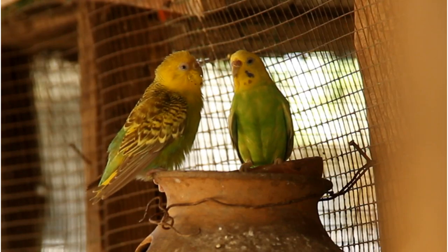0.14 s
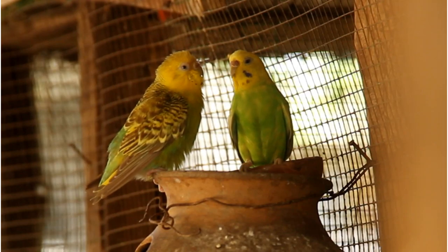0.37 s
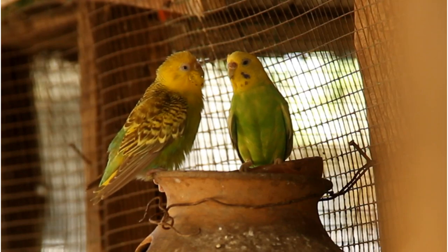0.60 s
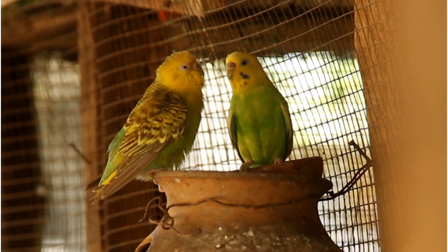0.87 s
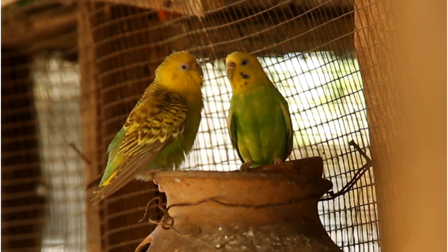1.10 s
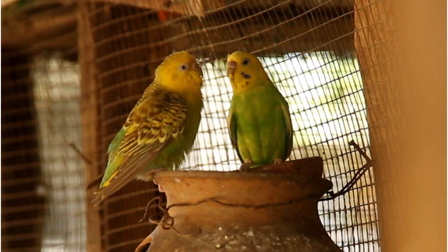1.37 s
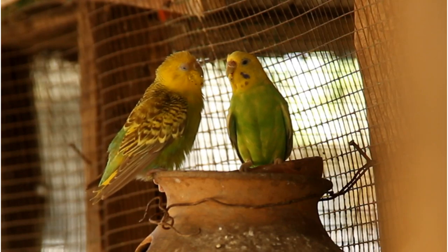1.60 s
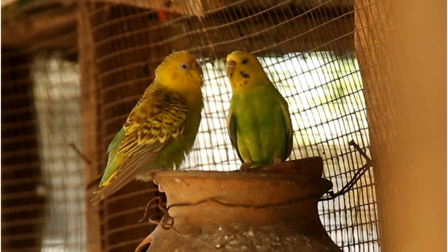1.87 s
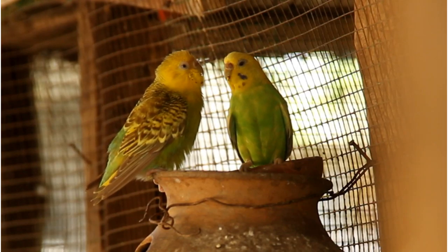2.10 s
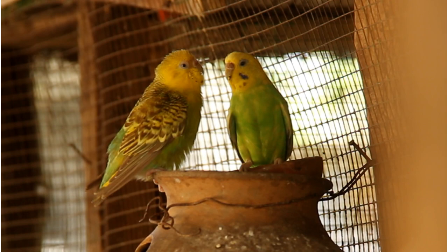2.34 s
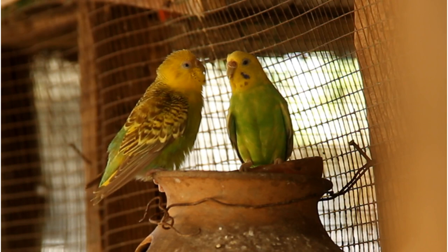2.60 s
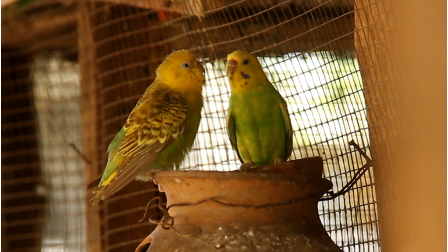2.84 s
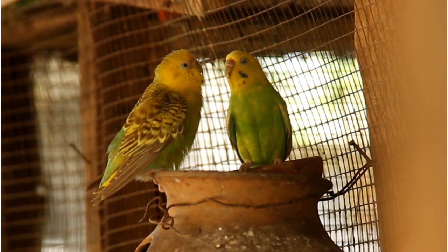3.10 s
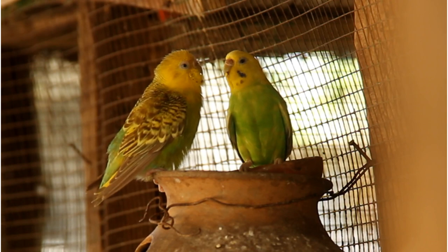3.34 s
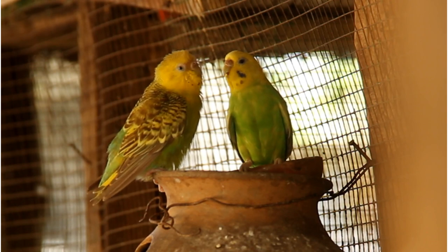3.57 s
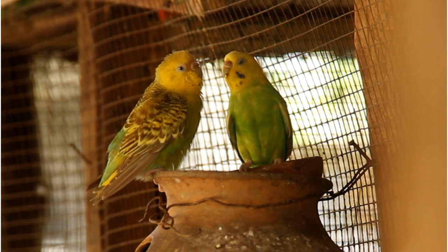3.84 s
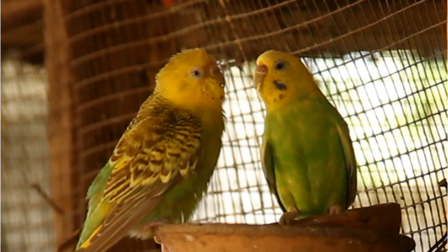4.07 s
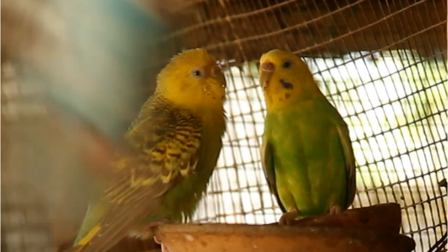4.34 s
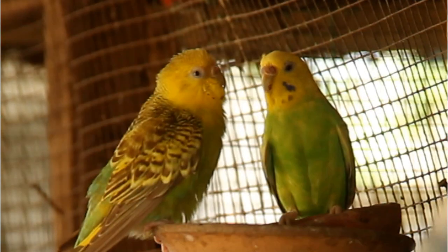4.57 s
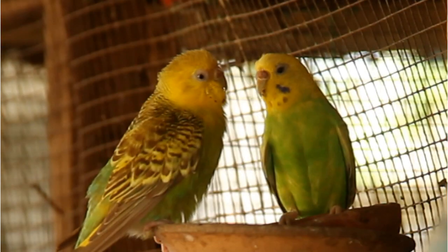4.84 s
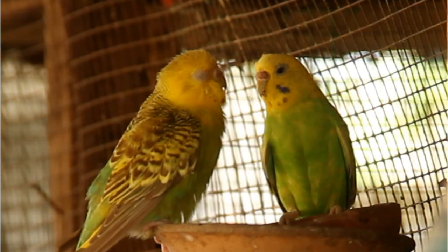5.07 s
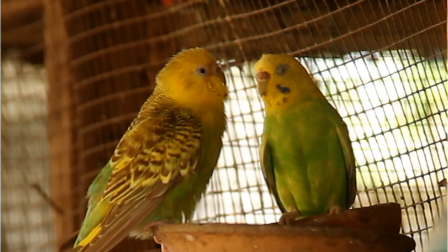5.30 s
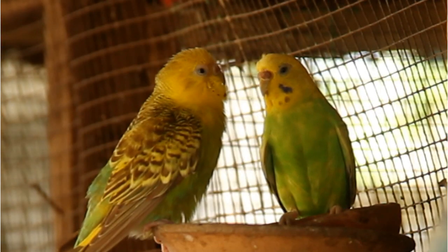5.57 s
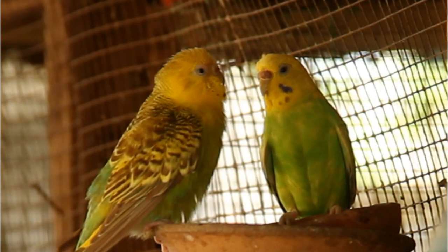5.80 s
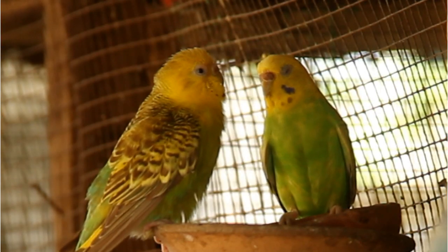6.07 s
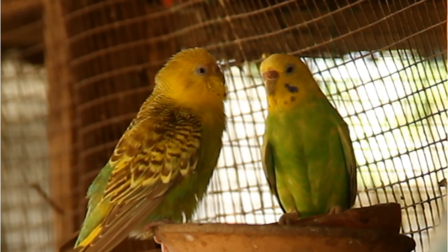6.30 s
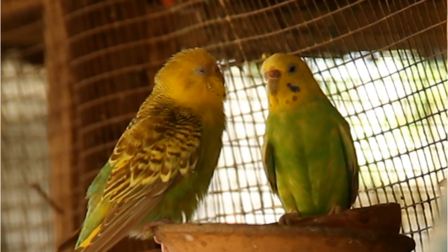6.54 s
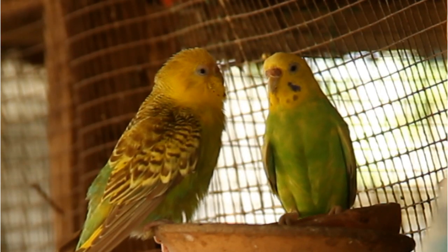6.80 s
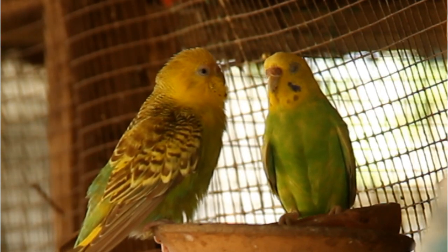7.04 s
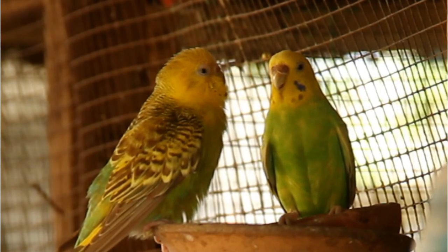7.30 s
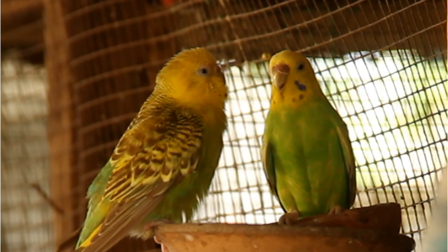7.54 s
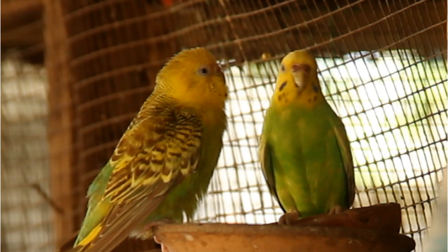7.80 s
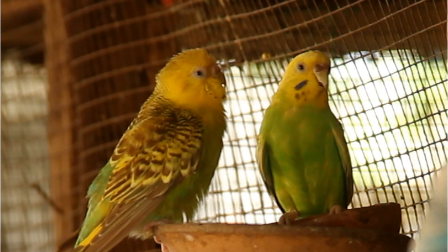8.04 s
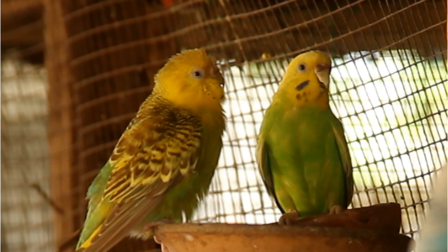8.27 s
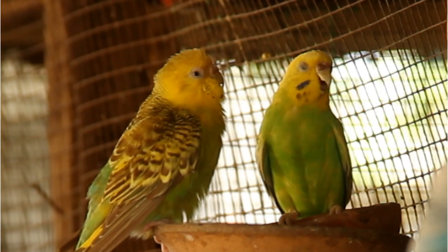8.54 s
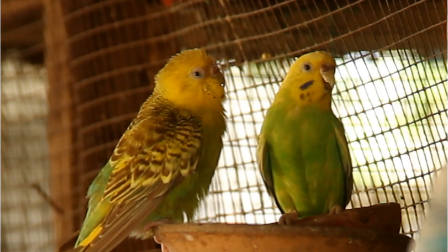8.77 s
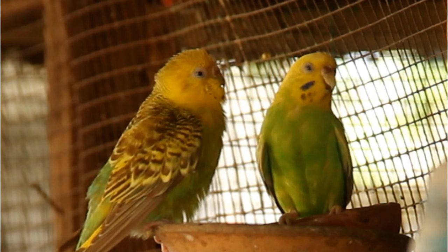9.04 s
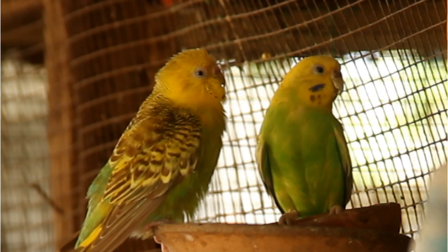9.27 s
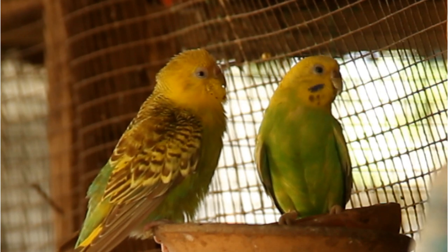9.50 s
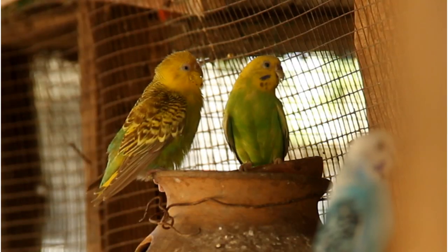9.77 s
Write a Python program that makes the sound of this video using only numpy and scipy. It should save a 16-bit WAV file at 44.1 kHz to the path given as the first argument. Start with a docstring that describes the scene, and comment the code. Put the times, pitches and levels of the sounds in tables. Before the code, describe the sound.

Close small parrots give clipped, gliding whistles and raspy squawks, with a flock twittering behind them in a wooden, wire-meshed aviary. Squawks grow harsh around two to three and a half seconds, then calls drop away as rapid wingbeats flutter past. After a quiet gap with sparse chirps, dense chatter returns from six seconds to the end. Faint dove coos and soft outdoor hum lie beneath; close microphone, short woody reflections.

```python
"""Parrots chattering in an aviary

Near birds whistle short gliding notes (wavering tones with overtones) and rasp out squawks (pulsed breath and buzz
through throat resonances); the flock twitters behind in many random notes. Feedback delays ring as planks and roof.
One bird flies past on puffs of feather noise; doves coo and a fowl cries far off over the outdoor hum of shaped noise.
Gain control ducks bright loud calls, then a soft overload rounds the peaks."""
import sys
import numpy as np
from scipy import signal
from scipy.fft import rfft, irfft, next_fast_len
from scipy.io import wavfile
from scipy.ndimage import uniform_filter1d

SR = 44100
rng = np.random.default_rng(int(sys.argv[2]) if len(sys.argv) > 2 else 0)


def wav_out(sig):
    """Save sig, one row per channel (or a flat mono array), as 16-bit PCM at SR to the path in sys.argv[1]."""
    wavfile.write(sys.argv[1], SR, np.round(np.clip(np.atleast_2d(sig).T, -1, 1) * 32767).astype(np.int16))


def makeup_ratio(level_db):
    """Linear amplitude ratio for a level in decibels (20 dB per factor of ten)."""
    decades = np.asarray(level_db, float) / 20
    return 10 ** decades


N = 436149


def rms_one(x):
    """Scale to rms 1."""
    return x / np.sqrt(np.mean(x ** 2) + 1e-20)


def level_curve(rows):
    """Gain at every sample from breakpoints (t/s, level/dB), straight in dB between them."""
    s, db = np.transpose(rows)
    return makeup_ratio(np.interp(np.arange(N) / SR, s, db))


def band(x, low_hz, high_hz):
    """Butterworth band-pass, rms 1."""
    return rms_one(signal.sosfilt(signal.butter(2, [low_hz, high_hz], "band", fs=SR, output="sos"), x))


def drift(rate_hz):
    """Random wander of rms 1: noise through two equal one-pole low-passes at rate_hz."""
    r = np.exp(-2 * np.pi * rate_hz / SR)
    return rms_one(signal.lfilter([1], [1, -2 * r, r * r], rng.standard_normal(N + SR))[SR:])


def coloured(spectrum):
    """Noise shaped to a spectrum of (f/Hz, relative level/dB), rms 1."""
    hz, db = np.transpose(spectrum)
    grid = np.arange(N // 2 + 1) * SR / N + 1
    gain = makeup_ratio(np.interp(np.log(grid), np.log(hz), db))
    return rms_one(irfft(rfft(rng.standard_normal(N)) * gain, N))


def add(out, start_s, piece):
    """Mix a piece in at a time, cut at both ends."""
    at = round(start_s * SR)
    piece = piece[max(-at, 0):max(N - at, 0)]
    out[max(at, 0):max(at, 0) + len(piece)] += piece


def glide(length_s, first_hz, last_hz, wobble, edge_s, scoop=0):
    """Phase and envelope of a gliding tone that swells and fades over edge_s; it may scoop up from below."""
    t = np.arange(min(round((length_s + edge_s) * SR), len(wobble))) / SR
    hz = first_hz + (last_hz - first_hz) * t / length_s
    hz = hz * (1 + wobble[:len(t)] - scoop * np.exp(-t / 0.0028))
    swell = np.clip(np.minimum(t, length_s + edge_s - t) / edge_s, 0, 1)
    return 2 * np.pi * np.cumsum(hz) / SR, np.sin(np.pi / 2 * swell) ** 2


def whistles(notes, waver, rough_db, scoop):
    """The syrinx gives a tone with overtones; pitch wavers and trembles, the membranes flutter and throb."""
    # partials above the second: (multiple of the pitch, level re second partial/dB)
    upper_partials = [(3, -7.5), (4, -17.5)]
    out = np.zeros(N)
    pitch = waver * (drift(105) + .7 * drift(450))
    for start, length, first, last, level_db, second_db in notes:
        wobble = pitch[round(max(start, 0) * SR):]
        phase, swell = glide(length, first, last, wobble, 0.0069, scoop)
        tone = np.sin(phase) + makeup_ratio(second_db) * np.sin(2 * phase)
        for k, upper_db in upper_partials:
            below_limit = k * max(first, last) < .3 * SR
            tone += makeup_ratio(second_db + upper_db) * np.sin(k * phase) * below_limit
        add(out, start - .003, np.sqrt(2) * makeup_ratio(level_db) * swell * tone)
    return out * rms_one(makeup_ratio(rough_db * (drift(345) + .7 * drift(70))))


def stutter(count, low_hz, octaves):
    """Very short steep whistles in quick succession: the voice breaking up inside a squawk, levelled out."""
    draw = rng.random((count, 6))
    first = low_hz * 2 ** (octaves * (draw[:, 2] + draw[:, 5]) / 2)
    last = first * (.9 + 0.204 * draw[:, 3])
    notes = np.transpose([draw[:, 0] * N / SR, 0.0027 + 0.0155 * draw[:, 1], first, last,
                          10.0 * draw[:, 4], np.full(count, -14.0)])
    broken = rms_one(whistles(notes, waver=.02, rough_db=3.5, scoop=0))
    return broken / np.sqrt(uniform_filter1d(broken ** 2, size=1500) + .3)


def squawks(rows, pulse_hz, jitter, noise_share, spread_db):
    """Uneven syrinx pulses gate a rush of air; each squawk stirs throat and beak resonances in its own measure."""
    # throat and beak resonances: (f/Hz, width/Hz, level/dB before each squawk's own scatter and tilt)
    throat = [(2800, 500, -14), (3800, 600, -14), (6250, 1000, -9), (8900, 1000, -13), (10900, 900, -13)]
    cycle = np.cumsum(pulse_hz * np.exp(jitter * drift(60))) / SR % 1
    gate = (noise_share + np.exp(-5.0 * cycle)) * makeup_ratio(2.0 * drift(40))

    # both membranes also sing, each a buzzy tone of drifting pitch
    buzz = np.zeros(N)
    for hz in (1500, 2050):
        phase = 2 * np.pi * np.cumsum(hz * np.exp(.12 * drift(14) + .035 * drift(250))) / SR
        buzz += rms_one(np.diff(np.exp(1.82 * np.cos(phase)), prepend=0))
    breath = makeup_ratio(-2) * rng.standard_normal(N)
    rasp = band((breath + buzz) * gate, 1700, 19000)  # a small throat passes no lows

    # two band-passes in a row: their overlapping skirts shape each part
    treble = band(band(rasp, 6720, 14400), 3840, 8270)
    chest = band(band(rasp, 370, 1664), 3150, 5020)
    broken = stutter(count=1100, low_hz=2100, octaves=1.2)
    rings = [makeup_ratio(db) * band(rasp, hz - width_hz / 2, hz + width_hz / 2) for hz, width_hz, db in throat]
    low = np.array(throat)[:, 0] < 4500

    out = np.zeros(N)
    strength = makeup_ratio(spread_db * rng.standard_normal((len(rows), len(throat))))
    for (peak, rise, fall, effort_db, chest_db), share in zip(rows, strength):
        at = np.arange(max(round((peak - 2 * rise) * SR), 0), min(round((peak + 2 * fall) * SR), N))
        late = at / SR - peak
        # about 20 dB down one rise before and one fall after the peak
        drop = np.where(late < 0, np.abs(late / rise) ** 3.17, np.abs(late / fall) ** 2.17)
        swell = makeup_ratio(effort_db - 20.1 * drop)
        # softer squawks hand more of the chest noise's power to broken whistles
        voiced = np.clip((-14 - effort_db) / 26, .3, .9)
        share = share * np.where(low, makeup_ratio(chest_db) * np.sqrt(1 - voiced), 1)
        lows = np.sqrt(1 - voiced) * chest[at] + np.sqrt(voiced) * broken[at]
        resonance = sum(g * ring[at] for g, ring in zip(share, rings))
        out[at] += swell * (treble[at] + makeup_ratio(chest_db + 1.5) * lows + resonance)
    return out


def near_birds():
    """The closest syrinxes: whistles, overtone-rich chirps, one bird's repeated trill, and squawks."""
    # nearly pure whistled notes: (start t/s, length/s, first f/Hz, last f/Hz, level/dB)
    whistle_notes = [(0.0, 0.022, 5700, 6320, -16.5), (0.0, 0.023, 7130, 6820, -18),
                     (0.046, 0.031, 3640, 3765, -22.5), (0.139, 0.026, 3216, 3335, -25.5),
                     (0.313, 0.17, 3240, 3190, -34), (0.496, 0.057, 4790, 2990, -26),
                     (0.669, 0.036, 3730, 3600, -11.5), (0.708, 0.032, 2540, 2570, -24),
                     (0.737, 0.043, 3556, 3200, -20.5), (0.829, 0.022, 3600, 3190, -11.5),
                     (0.885, 0.023, 3580, 3400, -16), (1.006, 0.0078, 4180, 4520, -19.5),
                     (0.929, 0.037, 3300, 3830, -16), (1.215, 0.017, 3700, 3350, -18),
                     (1.233, 0.022, 4670, 3930, -14), (1.236, 0.018, 2460, 1980, -25),
                     (1.27, 0.016, 4620, 4990, -16.5), (1.366, 0.038, 6150, 4690, -21),
                     (1.259, 0.025, 3470, 3200, -13.5), (1.29, 0.034, 3174, 3595, -13.5),
                     (1.48, 0.064, 2700, 2070, -29), (1.555, 0.016, 3370, 3520, -9),
                     (1.592, 0.026, 2960, 2880, -30), (2.021, 0.034, 2920, 2990, -16),
                     (2.049, 0.076, 3443, 3270, -19.5), (2.086, 0.07, 3894, 3574, -19.5),
                     (2.921, 0.015, 3000, 3066, -10.5), (2.963, 0.043, 2624, 2645, -20),
                     (3.007, 0.035, 4900, 4570, -9.5), (3.521, 0.025, 3850, 3680, -21),
                     (3.821, 0.022, 2470, 2550, -37), (3.877, 0.019, 3410, 3500, -36),
                     (4.298, 0.033, 1450, 1405, -40), (4.96, 0.025, 4150, 3450, -23.5),
                     (4.987, 0.039, 4000, 3300, -16.5), (5.021, 0.032, 2620, 3130, -23.5),
                     (5.023, 0.038, 3274, 3540, -19), (4.979, 0.021, 2410, 2000, -28.5),
                     (5.054, 0.05, 1847, 1350, -30.5), (5.075, 0.018, 3620, 3550, -28),
                     (5.275, 0.036, 3010, 3650, -42), (5.302, 0.027, 3630, 2800, -44),
                     (5.522, 0.055, 2830, 2870, -31.5), (5.601, 0.027, 3265, 3300, -22),
                     (5.622, 0.058, 3500, 3790, -28.5), (5.624, 0.048, 3230, 2844, -26),
                     (5.793, 0.02, 3430, 3270, -34), (5.869, 0.03, 2750, 2530, -29.5),
                     (5.901, 0.017, 3400, 3080, -36), (5.902, 0.05, 1860, 1583, -38.5),
                     (5.96, 0.047, 2550, 2850, -29), (5.938, 0.026, 3340, 3140, -28),
                     (6.047, 0.083, 3080, 3040, -20), (6.054, 0.049, 2380, 2062, -27.5),
                     (6.082, 0.066, 3904, 3590, -14.5), (6.209, 0.038, 3510, 3610, -19.5),
                     (6.342, 0.056, 2720, 2820, -17.5), (6.355, 0.029, 3730, 3460, -15),
                     (6.399, 0.088, 3500, 3720, -17.5), (6.458, 0.015, 3380, 3350, -11),
                     (6.503, 0.014, 3460, 3490, -10.5), (6.541, 0.13, 3320, 3830, -24),
                     (6.669, 0.012, 4040, 3530, -15), (6.719, 0.015, 3960, 4160, -16),
                     (6.786, 0.042, 3520, 3680, -21), (6.863, 0.037, 2710, 2950, -21.5),
                     (6.944, 0.072, 3960, 3760, -19.5), (6.954, 0.056, 3306, 3390, -16.5),
                     (7.107, 0.025, 3620, 3610, -15.5), (7.148, 0.042, 6620, 6370, -6),
                     (7.457, 0.016, 3040, 3080, -20.5), (7.891, 0.024, 3200, 2810, -37),
                     (8.045, 0.0079, 4870, 6000, -16.5), (8.053, 0.011, 6200, 4300, -17),
                     (8.268, 0.019, 3290, 3040, -22.5), (7.988, 0.0077, 4770, 4910, -10),
                     (8.101, 0.039, 2700, 3750, -22), (8.209, 0.031, 1506, 1020, -36.5),
                     (8.215, 0.037, 3860, 3490, -16), (8.301, 0.012, 4700, 4420, -25),
                     (8.352, 0.021, 3400, 3415, -17.5), (8.408, 0.052, 3170, 2670, -23),
                     (8.469, 0.022, 3540, 3450, -20.5), (8.491, 0.046, 2546, 2245, -26.5),
                     (8.517, 0.026, 3210, 3420, -20), (8.645, 0.039, 3580, 3570, -16),
                     (8.788, 0.029, 2530, 3230, -33), (8.822, 0.014, 4730, 4650, -31),
                     (8.69, 0.015, 2680, 2810, -23), (8.614, 0.011, 2294, 2280, -25),
                     (8.74, 0.1, 6650, 6280, -36), (8.859, 0.018, 3470, 3730, -9),
                     (8.895, 0.11, 3560, 3480, -21.5), (9.048, 0.016, 4530, 4530, -12.5),
                     (9.297, 0.084, 3700, 3226, -18), (9.099, 0.018, 2470, 2430, -24.5),
                     (9.14, 0.013, 2570, 2660, -23), (9.321, 0.05, 2840, 2840, -15),
                     (9.343, 0.07, 3114, 3750, -15.5), (9.446, 0.023, 3635, 3470, -18.5),
                     (9.523, 0.025, 3420, 3440, -22), (9.414, 0.091, 2670, 2730, -30.5),
                     (9.63, 0.031, 2380, 2390, -34), (9.632, 0.016, 3750, 3580, -24),
                     (9.664, 0.024, 3520, 3620, -22.5), (9.665, 0.031, 3150, 3200, -27),
                     (9.748, 0.016, 2890, 2940, -26), (9.77, 0.057, 2920, 3365, -18.5),
                     (9.833, 0.021, 3376, 3446, -11)]
    # chirps rich in overtones: (start t/s, length/s, first f/Hz, level/dB, second partial re first/dB)
    chirp_notes = [(0.249, 0.011, 2755, -39, 21.5), (0.433, 0.1, 2304, -28.5, -1),
                   (0.64, 0.03, 2904, -17, -14), (1.716, 0.044, 3876, -15, -4),
                   (1.724, 0.027, 4280, -16.5, -0.5), (2.655, 0.038, 3070, -26, 7),
                   (2.871, 0.047, 2740, -20, -7), (3.004, 0.04, 2385, -26, 2),
                   (3.046, 0.047, 3830, -18.5, -5.5), (3.088, 0.058, 1855, -31.5, 0),
                   (3.127, 0.04, 2010, -34, 10), (5.939, 0.06, 1555, -35, -10),
                   (7.117, 0.023, 2288, -16.5, -0.5), (7.112, 0.034, 5440, -18, -2),
                   (7.136, 0.033, 5730, -13.5, -4.5), (7.473, 0.0324, 3695, -15.5, -6.5),
                   (7.511, 0.024, 3290, -18, -9), (7.527, 0.045, 3785, -19, -7),
                   (7.987, 0.013, 2260, -28, 13), (8.666, 0.0074, 1670, -28.5, -1),
                   (8.93, 0.038, 1660, -32.5, 0), (9.169, 0.044, 2095, -39.5, 27.5),
                   (9.196, 0.045, 5890, -16, -9)]
    # one bird repeats a short chirp: (start t/s, f/Hz, level/dB)
    trill_notes = [(1.809, 3080, -24.5), (1.873, 2870, -20.5), (1.936, 2780, -21.5), (1.998, 2800, -19),
                   (2.06, 2670, -24.5), (2.13, 2704, -23.5), (2.203, 2660, -33)]
    # squawks: (peak t/s, rise/s, fall/s, effort as treble level/dB)
    squawk_calls = [(0.181, 0.048, 0.014, -36.5), (0.099, 0.069, 0.012, -39.5),
                    (0.261, 0.0032, 0.15, -35.5), (.375, 0.0078, 0.013, -27), (0.446, 0.045, 0.071, -23.5),
                    (0.656, 0.033, 0.029, -18.5), (.754, 0.02, 0.0084, -30.5), (.8, 0.023, 0.015, -36.5),
                    (.93, 0.066, 0.21, -38.5), (1.062, 0.01, 0.022, -22), (1.246, 0.033, 0.071, -31.5),
                    (1.393, 0.2, 0.039, -34.5), (1.618, 0.079, 0.037, -35), (1.792, 0.01, 0.053, -28),
                    (2.003, 0.0058, 0.023, -33), (2.279, 0.03, 0.014, -8.5), (2.402, 0.043, 0.039, -18),
                    (2.523, 0.034, 0.012, -20.5), (2.64, 0.025, 0.051, -10), (2.748, 0.022, 0.0077, -27),
                    (2.898, 0.069, 0.087, -19.5), (3.007, 0.014, 0.068, -11.5), (3.141, 0.079, 0.039, -10),
                    (3.276, 0.051, 0.056, -14), (3.453, 0.013, 0.018, -18), (3.528, 0.019, 0.024, -16.5),
                    (3.827, 0.005, 0.0044, -63), (3.882, 0.0056, 0.0099, -58), (3.954, 0.011, 0.0092, -62),
                    (5.06, 0.099, 0.06, -42), (5.559, 0.036, 0.04, -48), (5.778, 0.025, 0.021, -35.5),
                    (5.894, 0.0017, 0.0034, -47), (5.991, 0.002, 0.004, -39), (6.457, 0.1, 0.15, -33),
                    (6.547, 0.028, 0.024, -28), (6.601, 0.022, 0.031, -25), (6.683, 0.048, 0.056, -16.5),
                    (6.775, 0.02, 0.019, -16), (6.809, 0.021, 0.016, -16), (6.848, 0.025, 0.033, -17.5),
                    (6.921, 0.012, 0.053, -16.5), (7.072, 0.068, 0.054, -33.5), (7.134, 0.019, 0.0048, -15),
                    (7.38, 0.017, 0.01, -26), (7.498, 0.05, 0.13, -24), (7.631, 0.028, 0.012, -30),
                    (7.748, 0.037, 0.021, -28), (7.826, 0.011, 0.029, -34), (7.94, .012, 0.065, -17),
                    (8.0, 0.009, 0.016, -27), (8.221, 0.34, 0.037, -40), (8.447, 0.054, 0.051, -36.5),
                    (8.532, 0.016, 0.023, -24.5), (8.608, 0.0078, 0.0094, -33), (8.87, 0.026, 0.084, -32),
                    (9.057, 0.039, 0.093, -27.5), (9.145, 0.015, 0.029, -29), (9.202, 0.031, 0.013, -9),
                    (9.486, 0.073, 0.018, -36.5), (9.562, 0.021, 0.0098, -20), (9.788, 0.026, .018, -43)]
    pure = [(*row, -23) for row in whistle_notes]  # second partial re first, dB
    # a chirp climbs by 2.9 % over its length
    rich = [(s, length, hz, hz * (1 + 0.029), db, second_db) for s, length, hz, db, second_db in chirp_notes]
    trill = [(s, 0.012, hz, hz, db, 10.5) for s, hz, db in trill_notes]
    # the harder the squawk the brighter: the chest loses 1 dB re treble per dB of effort
    harsh = [(*row, -25 - row[3]) for row in squawk_calls]
    return (whistles(pure, waver=0.0179, rough_db=3.0, scoop=0.05)
            + whistles(rich, waver=0.0119, rough_db=3.0, scoop=0.059)
            + whistles(trill, waver=0.016, rough_db=3.0, scoop=0.295)
            + squawks(harsh, pulse_hz=336.0, jitter=0.5, noise_share=0.45, spread_db=4.0))


def flock(count, low_hz, octaves, spread_db, hoarse_db):
    """Many short overlapping notes of random pitch and slope, between them small hoarse rasps."""
    # twitter of the birds further back: (t/s, level/dB)
    flock_level = [(0.0, -33), (0.41, -35.5), (0.88, -21), (1.04, -31.5), (1.27, -56), (1.4, -27),
                   (1.93, -28), (2.67, -48), (3.08, -32), (3.25, -51), (4.32, -46), (4.87, -54.5),
                   (5.48, -44), (5.93, -39), (6.05, -24.5), (6.25, -23), (6.97, -29), (7.16, -52),
                   (8.32, -25), (9.15, -32), (9.26, -30.5), (9.36, -28), (9.89, -26)]
    draw = rng.random((count, 6))
    first = low_hz * 2 ** (octaves * (draw[:, 2] + draw[:, 5]) / 2)
    last = first * (.8 + 0.3617 * draw[:, 3])
    notes = np.transpose([draw[:, 0] * N / SR, 0.00407 + 0.01806 * draw[:, 1], first, last,
                          spread_db * draw[:, 4], np.full(count, -22.0)])
    draw = rng.random((count // 2, 4))
    rasps = np.transpose([draw[:, 0] * N / SR, 0.0039 + 0.0022 * draw[:, 1], 0.024 + 0.033 * draw[:, 1],
                          9.0 * draw[:, 2], 9.0 + 8.0 * draw[:, 3]])
    twitter = rms_one(whistles(notes, waver=0.02, rough_db=3.5, scoop=0.04))
    hoarse = rms_one(squawks(rasps, pulse_hz=400, jitter=.3, noise_share=.6, spread_db=3.0))
    twitter += makeup_ratio(hoarse_db) * hoarse
    # the sum is levelled to an even loudness
    twitter /= np.sqrt(uniform_filter1d(twitter ** 2, size=4000) + 0.05)
    return level_curve(flock_level) * twitter


def aviary(x):
    """Ten feedback delays between planks and roof, the highs fading almost as slowly as the lows."""
    low_t60_s, wall_hz = 0.58 / 5.5, 44000
    size = next_fast_len(N + SR)
    hz = np.arange(size // 2 + 1) * SR / size
    loss = 1 + (hz / wall_hz) ** 2 / 5.5  # dB loss re that of the lows
    response = 0
    for k, lag_s in enumerate(rng.uniform(0.008, .027, size=10)):
        loop = makeup_ratio(-60 * lag_s / low_t60_s * loss) * np.exp(-2j * np.pi * hz * lag_s)
        response = response + (-1) ** k * loop / (1 - loop)
    return irfft(rfft(x, size) * response, size)[:N]


def outdoor_air():
    """Outdoor hum and far hiss as shaped noise, with a far low rumble that swells and sinks."""
    # spectrum of hum and hiss: (f/Hz, relative level per Hz/dB)
    air_spectrum = [(35, -61), (60, -5.5), (327, -0.5), (464, -5.5), (533, -0.5), (869, -6.5), (999, -1.5),
                    (1320, -2), (3120, -7), (4740, -10), (6120, -2), (11500, -13), (15800, -26)]
    air = makeup_ratio(-45) * coloured(air_spectrum)
    return air + makeup_ratio(-59 + 1.5 * drift(0.5)) * band(rng.standard_normal(N), 70, 260)


def far_birds():
    """Doves give nearly pure low tones, some purring hoarsely; the fowl a falling row of partials."""
    # dove coos: (start t/s, length/s, first f/Hz, last f/Hz, level/dB)
    coos = [(1.003, 0.14, 798, 786, -55), (3.17, 0.4, 415, 422, -57), (3.502, 0.61, 541, 535, -59.5),
            (7.928, 0.094, 277, 282, -46.5), (8.072, 0.19, 410, 456, -51.5), (8.808, 0.205, 296, 275, -51),
            (9.637, 0.026, 650, 654, -45.5), (9.82, 0.046, 1176, 1176, -44.5)]
    # purring coos: (start t/s, length/s, f/Hz, level/dB before the throb)
    purrs = [(1.901, 0.11, 804, -48.5), (2.4, 0.53, 488, -53), (4.179, 0.22, 436, -52.5),
             (7.29, 0.26, 606, -49.5), (7.29, 0.22, 488, -52.5), (8.58, .2, 325, -54)]
    # fowl cry: (start t/s, length/s, first f/Hz, last f/Hz)
    fowl_cry = (1.1, .21, 385, 315)
    # partials of the cry: (multiple of the pitch, peak level/dB)
    fowl_partials = [(3, -44), (4, -52), (5, -47)]
    out, pitch = np.zeros(N), .008 * drift(25)
    for start, length, first, last, level_db in coos:
        phase, swell = glide(length, first, last, pitch[round(start * SR):], 0.011)
        add(out, start - .015, np.sqrt(2) * makeup_ratio(level_db) * swell * np.sin(phase))
    hoarse = .05 * drift(40)
    for start, length, hz, level_db in purrs:
        phase, swell = glide(length, hz, hz, hoarse[round(start * SR):], 0.022)
        throb = 1 + 0.56 * np.cos(2 * np.pi * 15 * np.arange(len(phase)) / SR)  # 15 Hz
        add(out, start - .015, np.sqrt(2) * makeup_ratio(level_db) * swell * throb * np.sin(phase))
    phase, swell = glide(*fowl_cry[1:], pitch, 0.019)
    add(out, fowl_cry[0], swell * sum(makeup_ratio(db) * np.sin(k * phase) for k, db in fowl_partials))
    return out * makeup_ratio(2.5 * drift(24))  # moving air makes far sounds flutter


def wings():
    """Each downstroke is a puff of feather noise; its treble snaps on harder and dies sooner."""
    # flight across the cage: (t/s, wing noise level between puffs/dB)
    flight_level = [(3.55, -62), (3.7, -49.5), (3.95, -42.5), (4.2, -51), (4.42, -40.5), (4.6, -51),
                    (4.85, -52), (5.0, -101)]
    # downstrokes of the wings: (t/s)
    downstrokes = [3.575, 3.63, 3.683, 3.742, 3.8, 3.854, 3.915, 3.968, 4.02, 4.08, 4.14, 4.205, 4.266,
                   4.325, 4.381, 4.432, 4.494, 4.545, 4.6, 4.652, 4.71]
    # rush of the feathers: (f/Hz, relative level per Hz/dB)
    feather_spectrum = [(24, -34), (40, -10), (130, -7), (637, -10.5), (2330, -14), (3220, -11.5),
                        (12100, -17), (15800, -38)]
    beat_db, snap_db, snap_hz = 8, 16, 6500
    stroke = np.interp(np.arange(N) / SR, downstrokes, np.arange(len(downstrokes))) % 1
    puff = np.exp(-2.2 * stroke) * np.minimum(stroke / .05, 1)
    rush = coloured(feather_spectrum)
    treble = signal.sosfilt(signal.butter(2, snap_hz, "high", fs=SR, output="sos"), rush)
    snapping = rush + (makeup_ratio(snap_db * (puff - .5)) - 1) * treble
    return level_curve(flight_level) * makeup_ratio(beat_db * puff) * snapping


def scene():
    """Birds in the aviary over wings, far birds and outdoor air."""
    birds = near_birds() + flock(count=1350, low_hz=1900, octaves=1.25, spread_db=11, hoarse_db=-4)
    reverb = makeup_ratio(-8.5) * aviary(birds)
    return (birds + reverb + outdoor_air() + far_birds() + wings())[None]


def gain_control(x, knee_db, ratio, release_db_per_s):
    """Treble-weighted level above the knee pulls the gain down at once; it comes back steadily."""
    bright = np.diff(x, prepend=0)
    level_db = 10 * np.log10(uniform_filter1d(bright ** 2, size=440) + 1e-12)
    cut_db = np.maximum(level_db - knee_db, 0) * ratio
    ramp = release_db_per_s * np.arange(N) / SR
    held = np.maximum.accumulate(cut_db + ramp) - ramp
    return x * makeup_ratio(-uniform_filter1d(held, size=220))


def top_cut(x):
    """Nothing passes above the cut-off."""
    return signal.sosfilt(signal.butter(12, 15990, fs=SR, output="sos"), x)


def record(dry):
    """Gain control under bright loud calls, then soft overload."""
    x = gain_control(dry[0], knee_db=-20.0, ratio=0.47, release_db_per_s=34.5)
    mix = np.tanh(x / 0.94)[None]
    return top_cut(mix)


dry = scene()
out = record(dry)
wav_out(out)
```